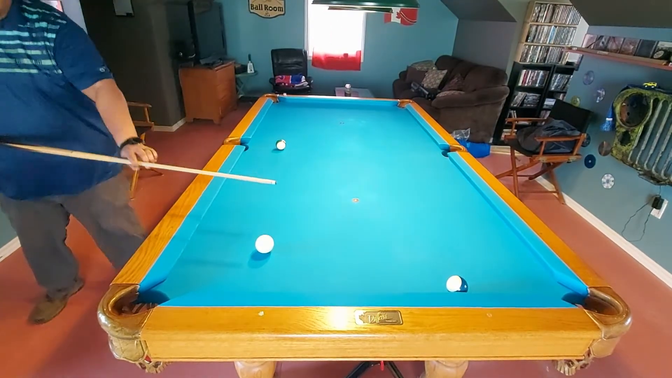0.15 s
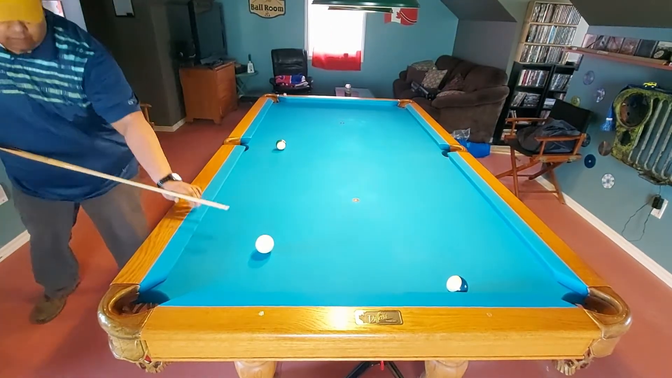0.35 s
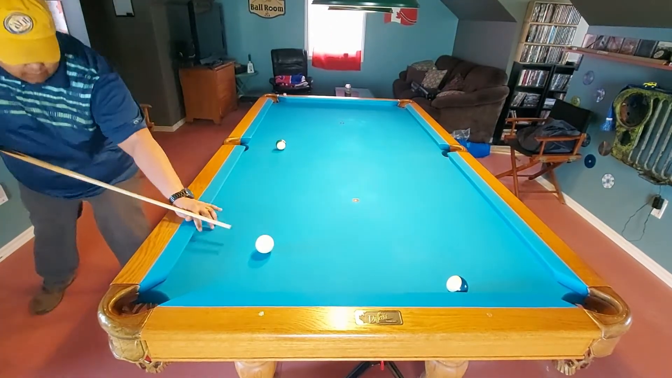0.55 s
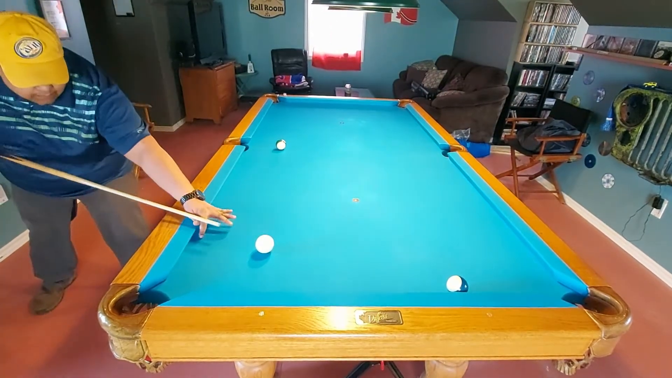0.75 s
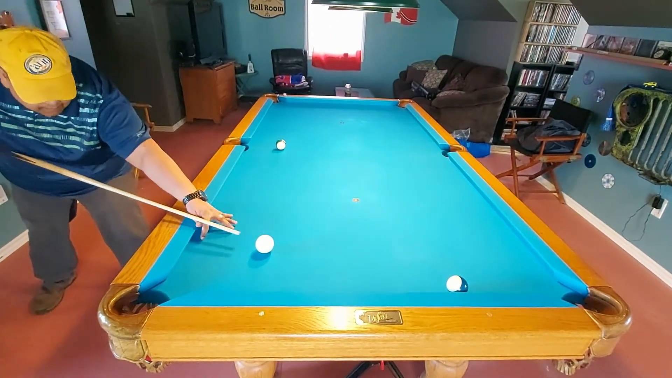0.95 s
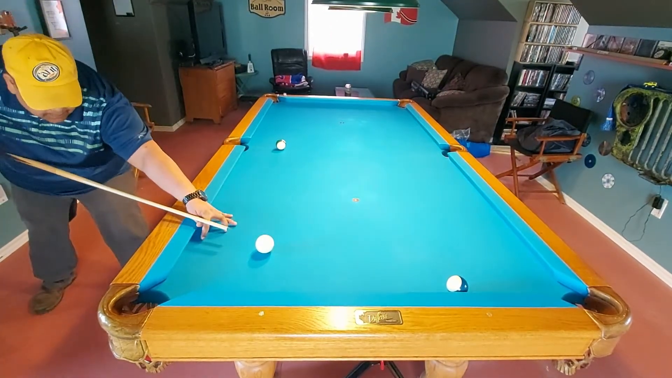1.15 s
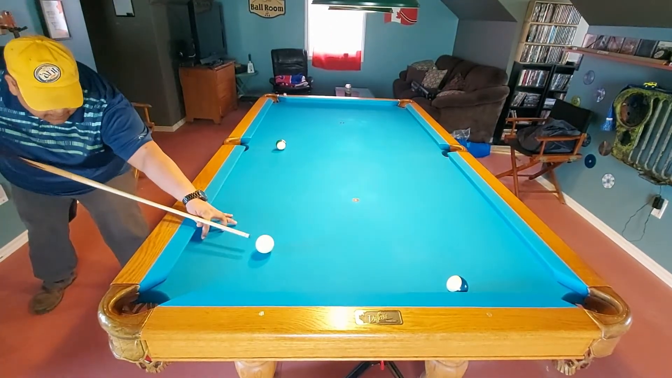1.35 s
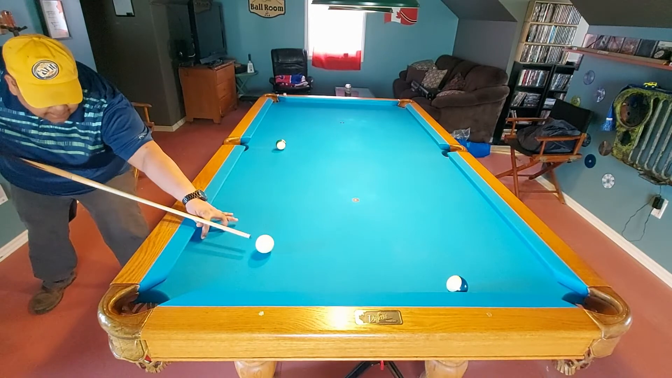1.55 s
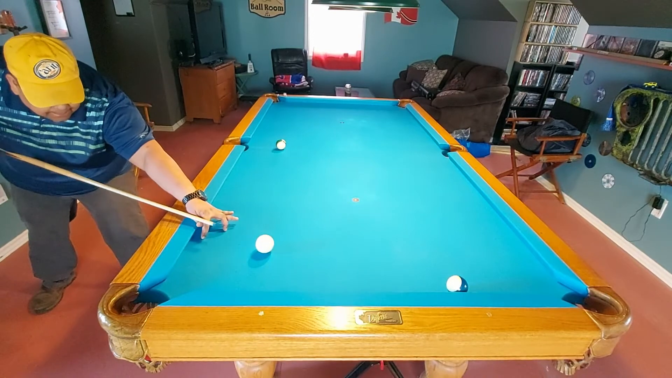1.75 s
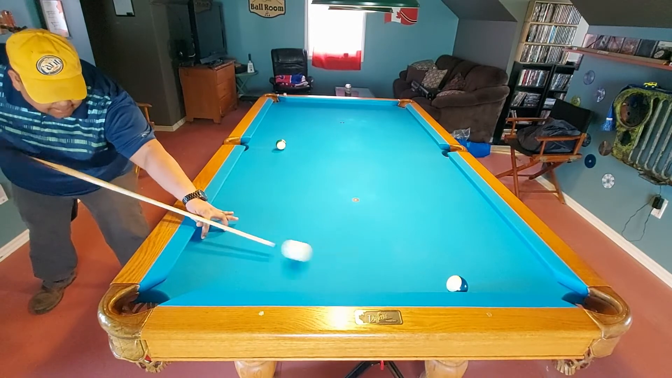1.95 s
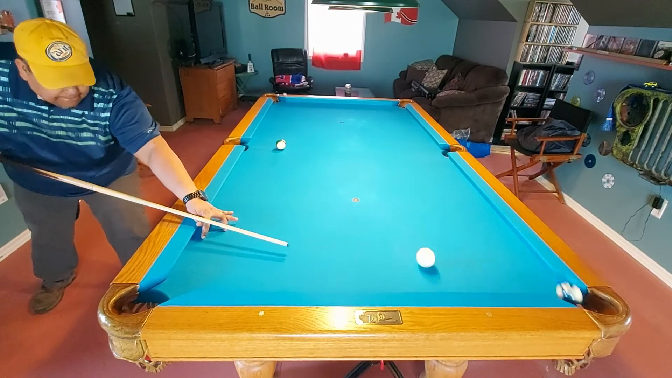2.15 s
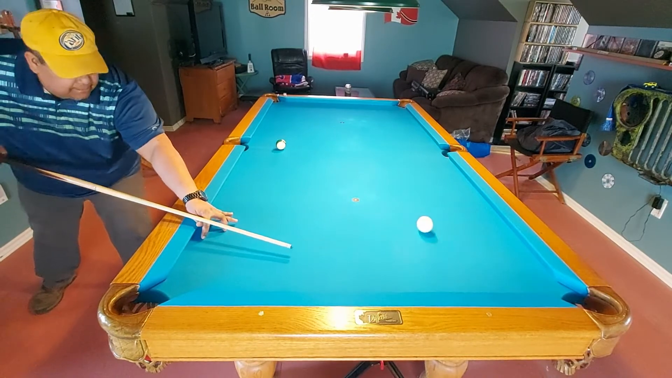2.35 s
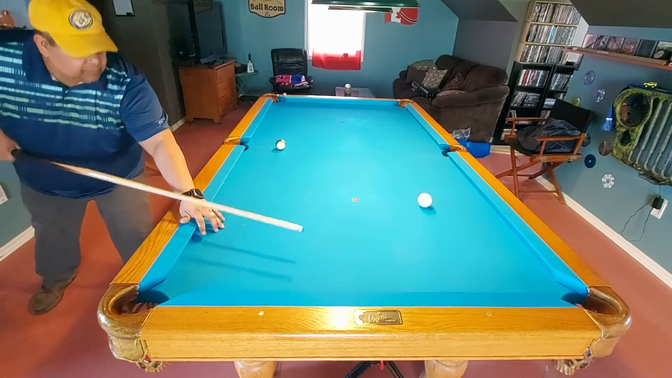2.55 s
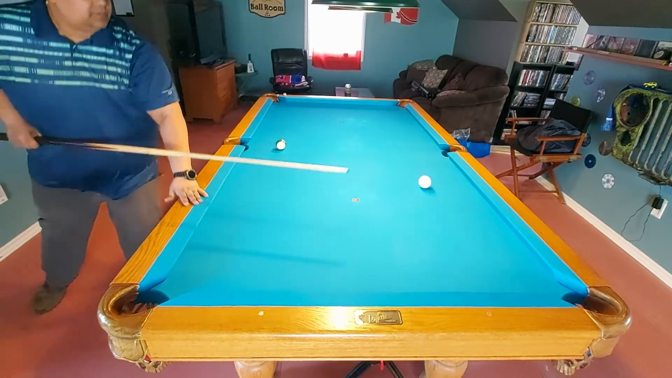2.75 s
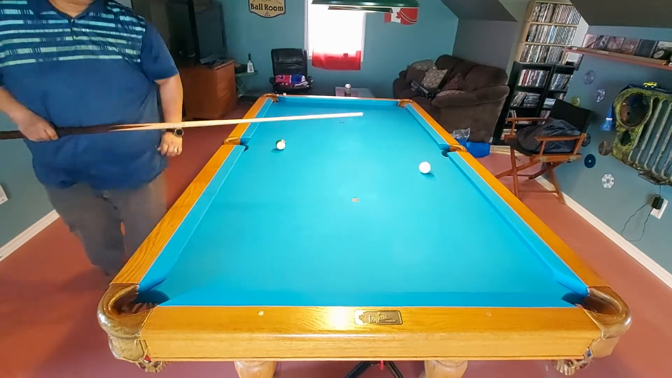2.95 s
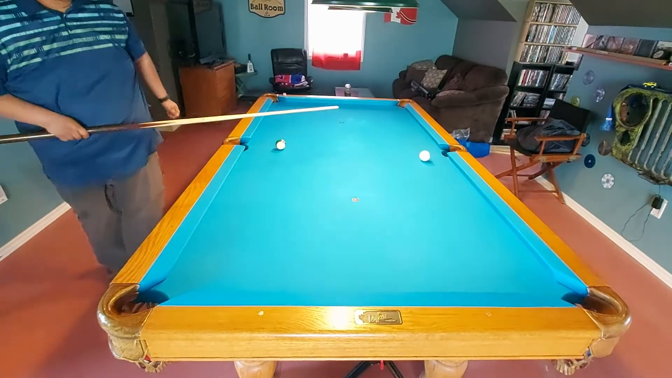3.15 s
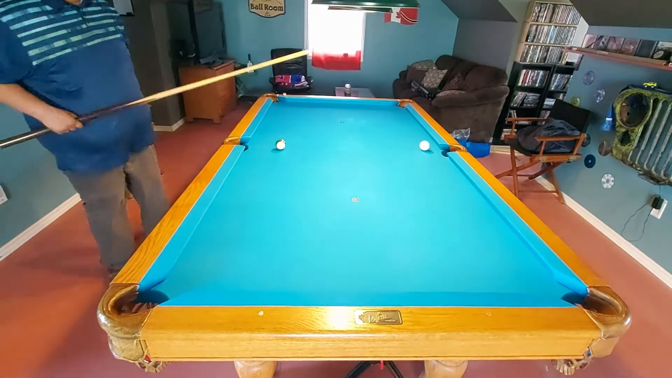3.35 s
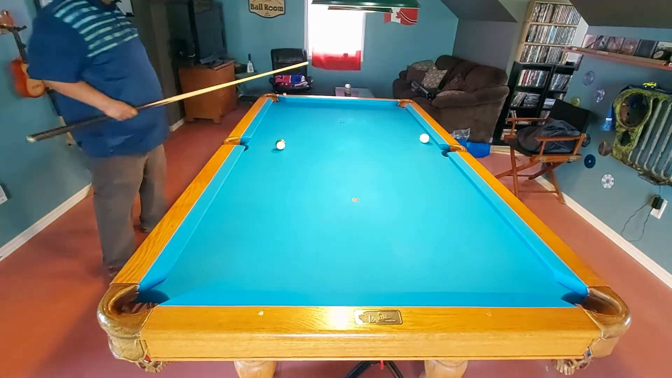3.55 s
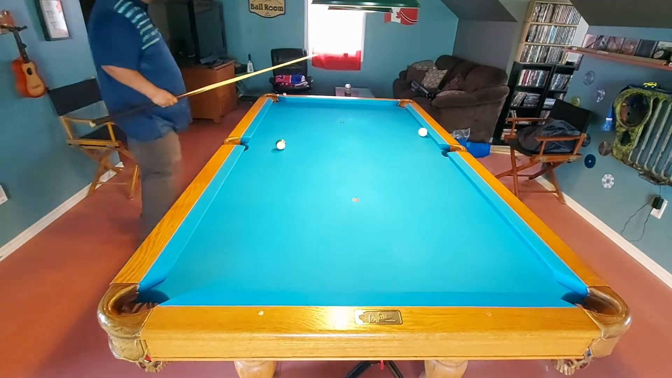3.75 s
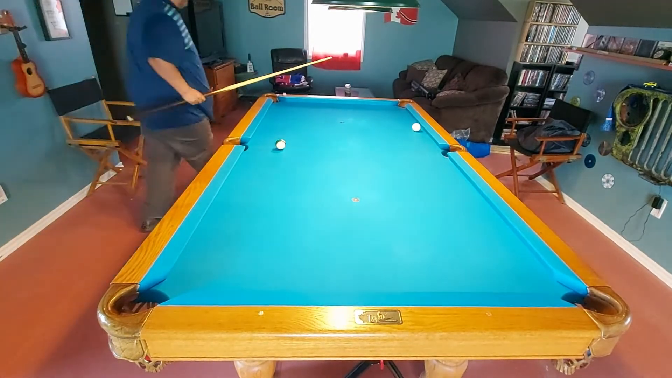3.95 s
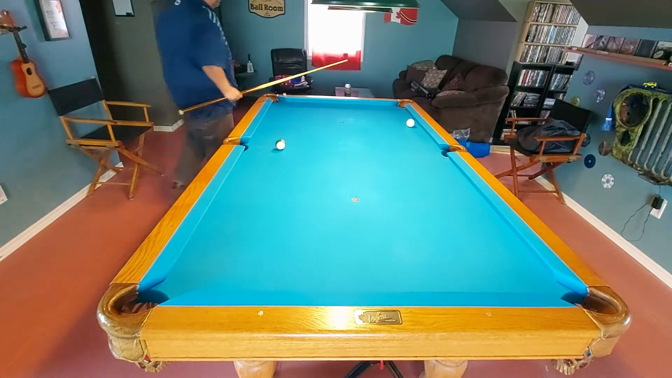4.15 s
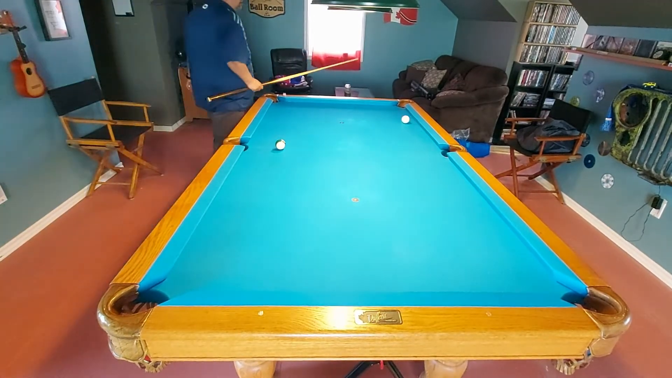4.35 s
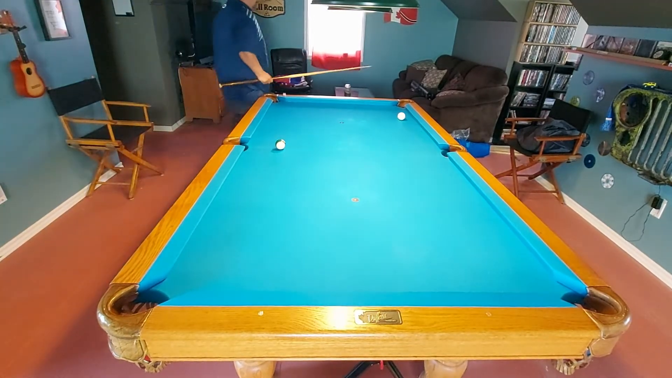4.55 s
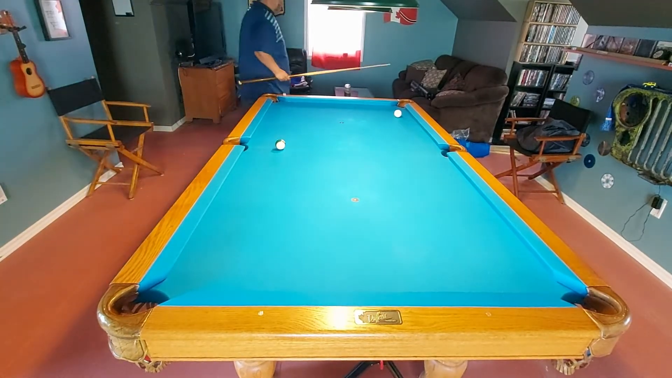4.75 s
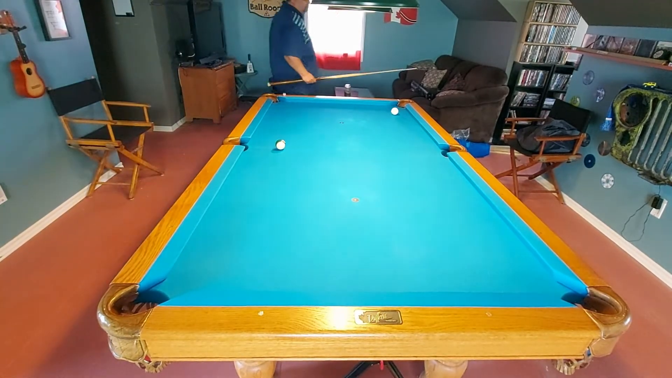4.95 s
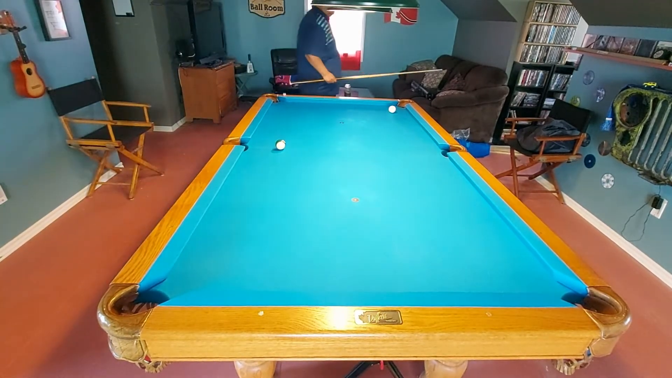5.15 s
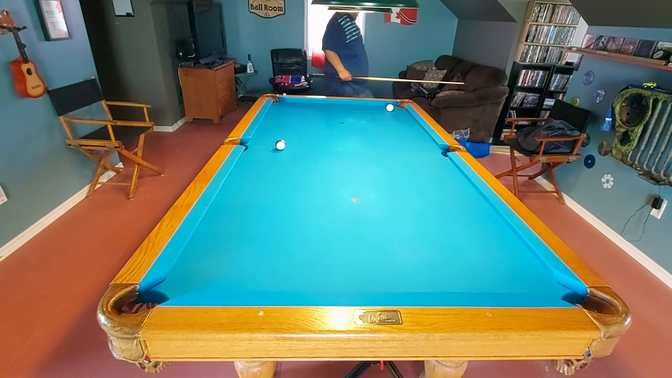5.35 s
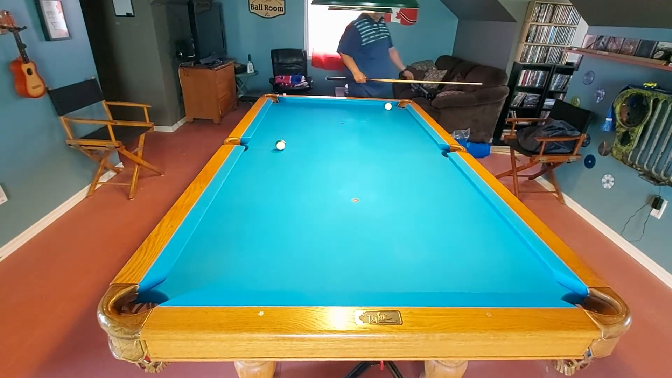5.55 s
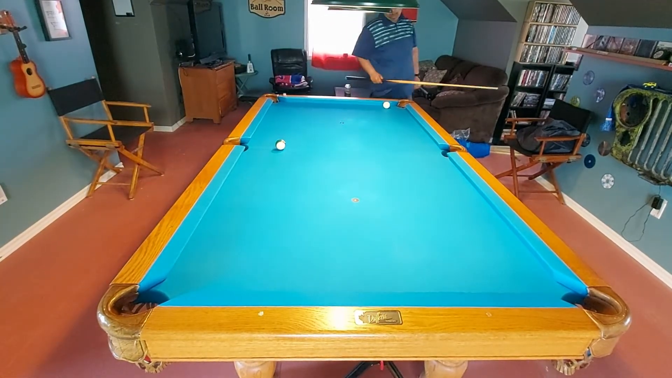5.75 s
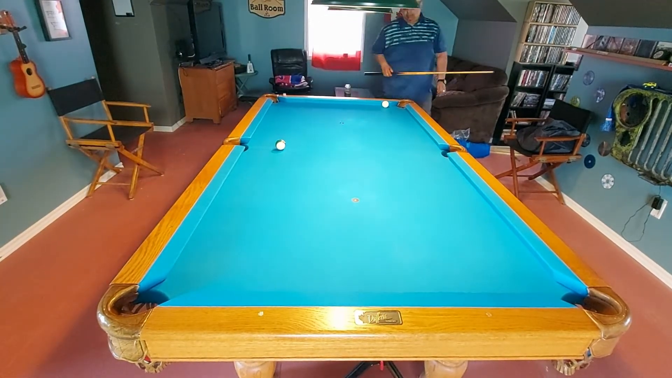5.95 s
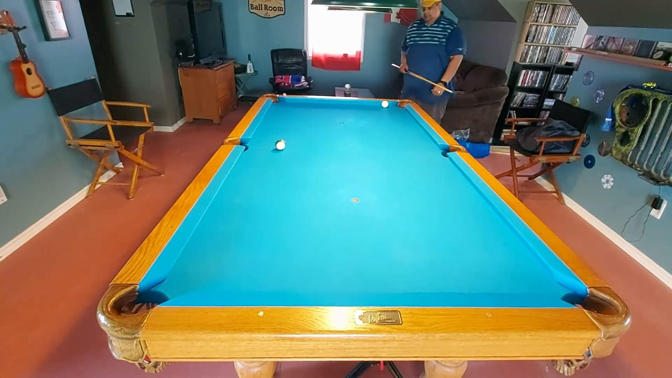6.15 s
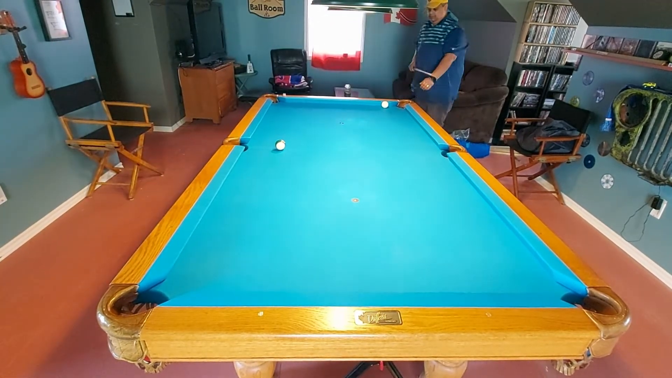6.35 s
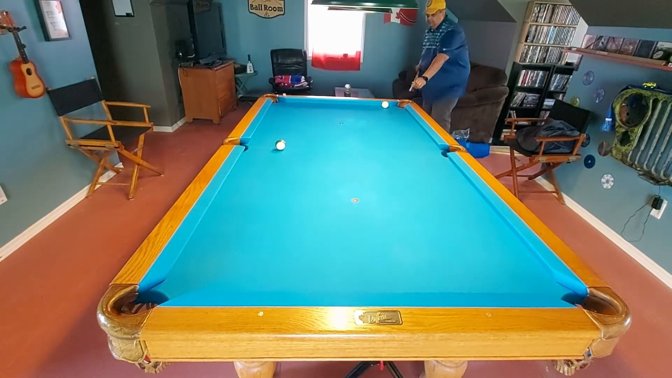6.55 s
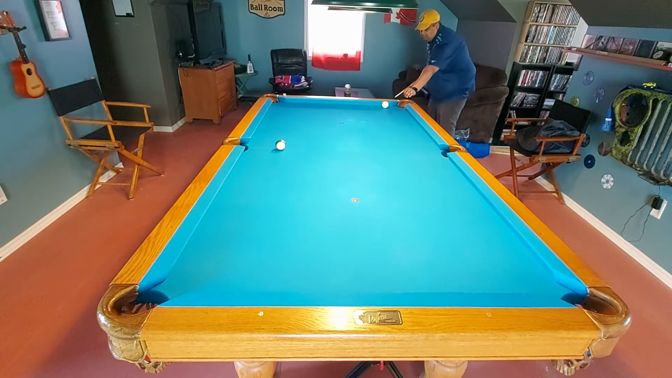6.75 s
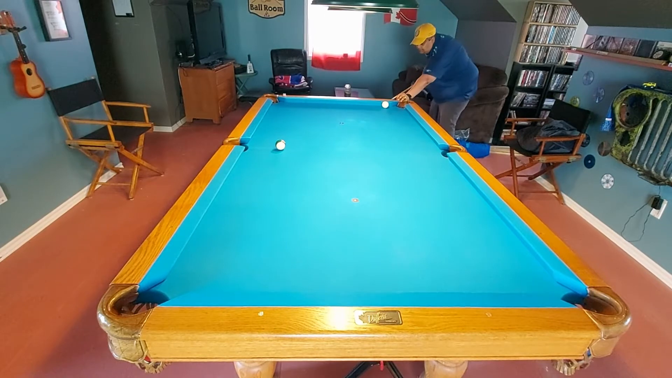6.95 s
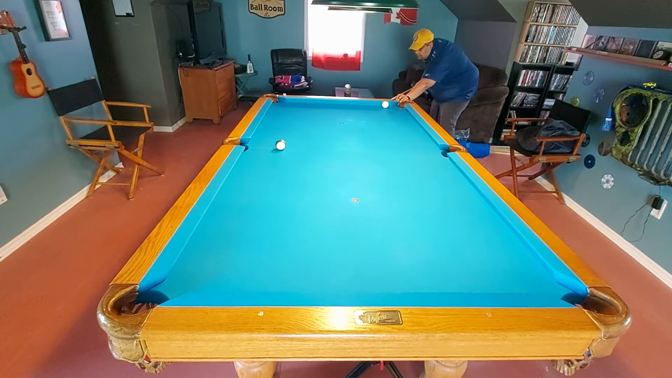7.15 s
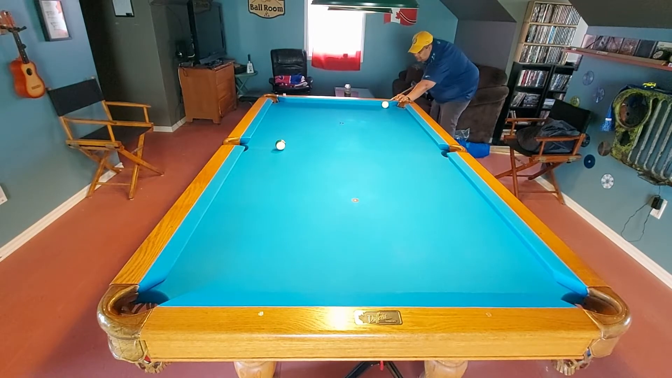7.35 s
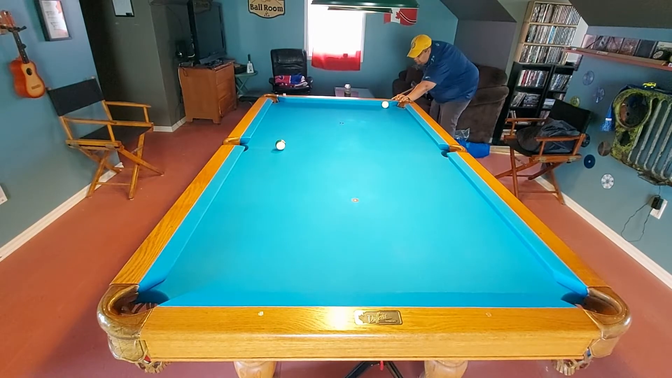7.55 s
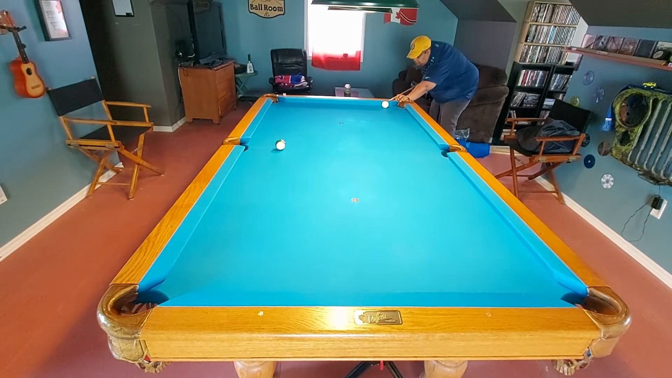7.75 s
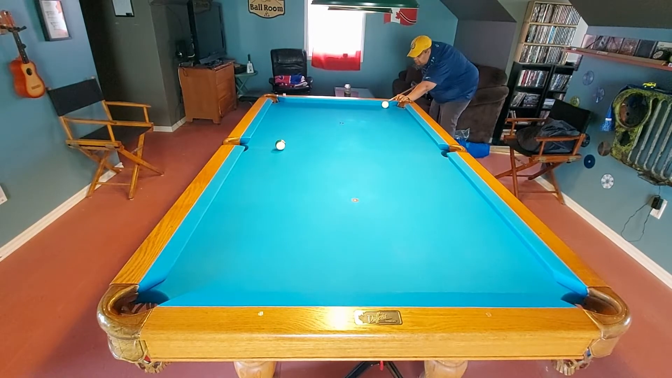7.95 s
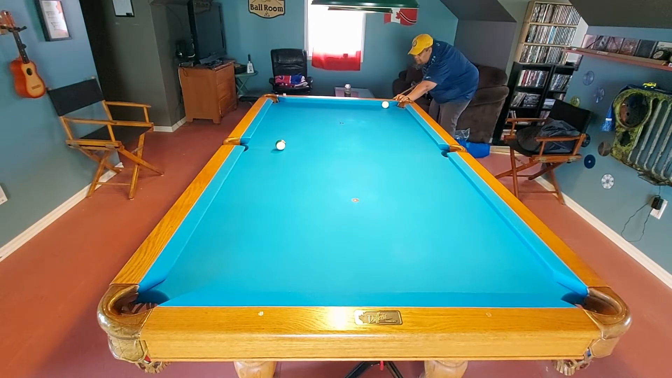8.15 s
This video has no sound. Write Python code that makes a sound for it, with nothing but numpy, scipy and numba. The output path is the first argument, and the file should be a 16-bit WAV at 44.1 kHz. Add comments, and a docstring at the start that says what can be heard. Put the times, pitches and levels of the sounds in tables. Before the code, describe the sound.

A carpeted games room, heard in stereo from near the table. From 0 to 1.9 seconds there is low mains hum and soft air noise, with dull footfalls at about 0.1, 0.2 and 0.5 and tiny bright metal ticks around 1.3 and 1.4. At 1.94 the cue knocks the ball; a very loud, hard ball-on-ball crack follows at 2.06 and a woody pocket knock at 2.14, merging into one dense burst. Weaker clacks on balls in the pocket come at 2.26, 2.35 and 2.42, ringing out briefly. The hum is gone and a faint hush remains. From about 2.75 to 6.6 the player walks: low ringing thuds, board and joist grumble, brushing shoes and cloth, strongest near 4.4 and 5.9. After 7 only faint, low floor thuds and soft rumble remain until about 8.

```python
"""Pool shot and walk

A pool shot in a carpeted games room: cue on ball, ball on ball, ball into the pocket and onto balls lying
there. Each knock is a dense, held wash of noise echoes; what rang before sinks just ahead of each later knock,
and hard clicks stand out of it. Mains-hum sines, noise room air, a few footfalls and small metal ticks come
before the shot. Afterwards the player walks round the table: ringing thuds, board and joist noise, swells of
shoe and cloth noise."""
import sys
import numpy as np
from scipy import signal
from scipy.fft import rfft, irfft, next_fast_len
from scipy.io import wavfile
from numba import njit

SR = 44100
rng = np.random.default_rng(int(sys.argv[2]) if len(sys.argv) > 2 else 0)


def dump(signal):
    """Clip the signal to [-1, 1] and save it as 16-bit WAV at the path in sys.argv[1]."""
    limited = np.clip(np.atleast_2d(signal).T, -1, 1)
    pcm = np.round(limited * 32767).astype(np.int16)
    wavfile.write(sys.argv[1], SR, pcm)


N = 361619  # length in samples

# Mains hum lines: pitch_hz, level_db before a shared trim
HUM_LINES = [(59.9, -45), (119.8, -52.5), (212, -62)]
# How far the left side leads on each hum line: phase_rad
HUM_LEAD_RAD = [.1, 0.53, .4]
# Hum and air over time, dropping away just before the shot: time_s, air_db, hum_change_db
ROOM_TONE = [(0, -49, -5), (.15, -47.5, 0.5), (.35, -50, -1.5), (.5, -47, -4), (.65, -50, -1.5),
             (1.868, -50.5, -2.5), (1.876, -74, -21), (1.94, -72, -14), (2.0, -86, -40.5),
             (8.2, -75, -41.5)]
# Tone colour of the room air: freq_hz, relative_db
AIR_COLOUR = [(15, -45), (25, -12), (64, -7), (91, -20), (107, -13.5), (129, -9), (152, -22), (215, -15),
              (267, -20), (297, -19.5), (666, -26), (2560, -31.5), (15500, -41)]
# Left-right likeness of the room air: freq_hz, likeness (0 to 1)
AIR_LIKENESS = [(60, 1), (200, 0.81), (1000, 0.85), (5000, 0.66), (15000, .4)]

# Weight coming down on a floorboard:
# full_level_s, rise_s, held_s, boards_db, board_pitch_hz, joists_db
FLOOR_LOADS = [(0.2, 0.033, 0.061, -47.5, 320, -73), (2.5, 0.037, 0.041, -57, 155, -58),
               (2.64, .03, .01, -65, 152, -58), (2.78, 0.032, .01, -55.5, 248, -69.5),
               (2.95, 0.032, 0.1, -53, 179.5, -53), (3.249, 0.031, 0.011, -43.5, 222, -52),
               (3.35, .04, 0.0082, -44, 306, -66), (3.49, .04, 0.1, -52.5, 172, -55),
               (3.929, 0.099, 0.0083, -59, 252, -59), (4.01, 0.026, 0.1, -49, 173, -50),
               (4.29, 0.033, .01, -50.5, 196, -53), (4.4, 0.018, 0.11, -39.5, 163, -63),
               (4.54, 0.043, 0.067, -44.5, 340, -62), (4.849, 0.11, 0.086, -48, 165, -53.5),
               (5.248, 0.035, 0.0044, -37.5, 194, -46), (5.36, .04, .01, -44.5, 288, -56),
               (5.56, 0.038, 0.04, -44, 299, -52), (5.72, .05, 0.012, -56, 178, -53),
               (5.95, 0.034, 0.024, -42, 151, -55.5), (6.1, .05, 0.021, -63.5, 180, -55.5),
               (6.33, 0.072, 0.091, -47.5, 199, -48), (6.63, 0.022, 0.014, -37, 162, -44),
               (6.93, .02, .02, -59, 142, -51.5), (7.24, .04, .1, -64, 146, -49.5),
               (7.48, 0.065, 0.012, -58.5, 171.2, -54.5), (7.62, .05, 0.045, -69.5, 140, -57),
               (7.78, 0.046, .01, -61, 138, -54.5), (7.94, 0.066, .01, -65, 170, -56),
               (8.13, .04, 0.069, -62.5, 188, -49)]
# Low rumble: the shot shakes the floor, then a faint rest stays: time_s, level_db
FLOOR_SHAKE = [(1.94, -66), (2.01, -44), (2.22, -54.5), (2.32, -44), (2.45, -57.5), (5.0, -61), (8.2, -64)]
# Broad grumble of the boards: freq_hz, relative_db
BOARDS_COLOUR = [(65, -37), (110, -15), (146, 0.5), (198, -13.5), (270, -5.5), (337, -6), (405, -5.5),
                 (503, -16.5), (800, -24), (1040, -43), (1760, -120)]
# Low rumble of the joists: freq_hz, relative_db
JOISTS_COLOUR = [(15, -57.5), (25, -29.5), (39, -16), (49, -5), (86, 0), (114, -4.5), (140, -4), (180, -32),
                 (310, -120)]
BOARDS_FADE_DB_PER_S, JOISTS_FADE_DB_PER_S, JOISTS_LAG_S = 185, 62, 0.019
BOARD_WIDTH_HZ, BOARD_RING_DB = 46, -4
# Left-right likeness of the walking sounds and the hush: freq_hz, likeness (0 to 1)
WALK_LIKENESS = [(30, .6), (80, 0), (500, 0.01), (10000, 0)]
# Footfalls: start_s, level_db, thud_pitch_hz, push_t60_s
FOOTFALLS = [(0.129, -34.5, 72, 0.4), (0.209, -40, 72, 0.39), (0.492, -40, 72.7, 0.28),
             (2.948, -43.5, 191, 0.41), (3.233, -39, 231.4, 0.22), (3.344, -39.5, 265.5, 0.35),
             (3.47, -41.5, 141, 0.34), (3.829, -48.5, 652, 0.2), (4.001, -42, 73, 0.33),
             (4.394, -28.5, 137.6, 0.52), (4.468, -34.5, 246, 0.38), (4.743, -46, 282, 0.34),
             (4.975, -51, 800, 0.2), (5.195, -37, 73.7, 0.26), (5.231, -38, 132, 0.34),
             (5.537, -47, 378, 0.33), (5.763, -52, 82, 0.28), (5.942, -31.5, 145.4, 0.43),
             (6.298, -44, 118, 0.27), (6.611, -36.5, 97, 0.32), (6.877, -40, 91, 0.24),
             (7.096, -46, 91.5, 0.35), (7.767, -41.5, 80.7, 0.4), (8.011, -46, 96, 0.35)]

# Small metal ticks: start_s, level_db
METAL_TICKS = [(1.2755, -41), (1.311, -56), (1.374, -37.5), (1.389, -57), (1.409, -56)]
# Ringing modes of the metal: pitch_hz, relative_db, t60_s
METAL_MODES = [(3250, -15, .012), (6000, 0.5, 0.0053), (7300, -18, .01), (8300, -2, .02), (9290, 1, 0.019),
               (10550, -4, .01), (11600, -14, .01), (13300, -5, .012), (14350, 1, 0.022),
               (14800, -12, .012)]

# Knocks of cue on ball: start_s, start_level_db, rise_s, held_s, lift_while_held_db_per_s,
# lead_s (how early older knocks start to sink), sink_db (how far they sink)
CUE_HITS = [(1.938, -20.5, 0.0014, .04, 59.5, .066, 20), (1.986, -27.5, .003, .055, 80, .006, 2.5)]
# Knocks of ball on ball: same columns as CUE_HITS
BALL_HITS = [(2.052, -12.5, .011, 0.046, 39.92, .006, 8), (2.108, -21, 0.0044, .012, 30, 0.0046, 2)]
# Knocks of ball into pocket: same columns as CUE_HITS
POCKET_HITS = [(2.137, -10.5, 0.0058, .02, 59.74, .02, 4), (2.163, -15.5, .003, 0.023, 40, 0.0046, 2)]
# Knocks on the balls lying in the pocket: same columns as CUE_HITS
NESTED_HITS = [(2.256, -25, .004, 0.057, 60, 0.0033, 0.93), (2.34, -32.5, 0.0019, 0.013, 60, .012, 3.8),
               (2.356, -30.5, 0.0021, 0.031, 60, .003, 1), (2.421, -39, 0.0033, 0.026, 60, .006, 0.82)]
# Tone colour of cue on ball: freq_hz, relative_db
CUE_COLOUR = [(24, -44.5), (40, -17.5), (146, -15.5), (484, -2), (653, -7.5), (740, -5), (881, -8),
              (1020, -7.5), (1450, -19.5), (1770, -11.5), (1960, -21), (3930, -22), (4460, -29.5),
              (11800, -38), (15500, -45.5)]
# Tone colour of ball on ball: freq_hz, relative_db
BALL_COLOUR = [(24, -46.5), (40, -14), (325, -14), (577, -4), (740, -19.5), (949, -10.5), (1280, -7.5),
               (1380, -5.5), (2390, -5), (3930, -15), (5300, -39.5), (7160, -32.5), (11200, -46.5),
               (12400, -33), (15500, -31)]
# Tone colour of the pocket: freq_hz, relative_db
POCKET_COLOUR = [(24, -62), (40, -30), (82, -19), (235, -20.5), (317, -5.5), (548, -6), (606, -4),
                 (797, -9), (1020, -3), (1130, -12.5), (2390, -23.5), (4920, -44), (7340, -50.5),
                 (9650, -62.5), (15500, -66)]
# Tone colour of the balls lying in the pocket: freq_hz, relative_db
NESTED_COLOUR = [(24, -31), (40, -15.5), (64, 2), (132, -24), (192, -5), (301, -11), (387, -24),
                 (461, -13.5), (686, -9), (973, -6), (2220, -1.5), (4460, -26), (7710, -32), (8960, -39),
                 (15500, -29)]
# Resonances of cue on ball: pitch_hz, width_hz, relative_db
CUE_RING = [(468, 190, -2.5), (738, 25, -5), (940, 66, -8.5), (1770, 34, -13.5), (2730, 31, -24),
            (3260, 59, -19.5), (3908, 49, -20), (4670, 82, -28.5)]
# Resonances of ball on ball: pitch_hz, width_hz, relative_db
BALL_RING = [(615, 48, 2.5), (1260, 52, -4.5), (1465, 60, -0.5), (1730, 170, -2), (2335, 38, 1.5),
             (2530, 20, -0.5), (2730, 20, -8.5), (3530, 110, -9)]
# Resonances of the pocket: pitch_hz, width_hz, relative_db
POCKET_RING = [(328, 35, -4.5), (791, 180, 2), (1210, 34, -10.5), (1850, 62, -14.5), (2080, 19, -20)]
# Resonances of the balls lying in the pocket: pitch_hz, width_hz, relative_db
NESTED_RING = [(355, 59, 5), (830, 220, -10), (1910, 14, 1.5), (2040, 9.1, 4), (2285, 43, -28),
               (2420, 20, -2), (2640, 27, 3.5), (3360, 57, 2)]
# Reverberation of the room: freq_hz, t60_s
ROOM_T60 = [(150, 0.61), (400, 0.61), (1000, 0.45), (2500, .38), (5000, 0.29), (12000, 0.3)]
# Left-right likeness of the knocks: freq_hz, likeness (-1 to 1)
KNOCK_LIKENESS = [(60, 0.25), (200, -0.3), (400, -0.066), (2000, .05), (10000, 0.53)]
ECHOES_PER_S, RING_DB, FADE_DB_PER_S = 14000, -4, 58
# Hard arrivals that stand out of the wash: start_s, level_db, upper_ring_hz, t60_s, left_over_right_db
CRACKS = [(2.0623, -5, 1790, 0.039, -2), (2.068, -11.5, 3360, 0.019, 1), (2.1418, -7, 802, 0.1, -1),
          (2.165, -7.5, 820, 0.032, 6), (2.357, -24, 2330, .03, 0), (2.5, -40, 900, 0.14, -2)]

# Scuffs of shoe and trouser cloth: full_level_s, rise_s, held_s, fade_db_per_s, soles_db, cloth_db
SCUFFS = [(2.75, 0.018, 0.038, 251, -56.5, -57), (3.0, 0.087, 0.074, 60, -67, -64),
          (3.231, 0.014, 0.031, 202, -53, -60), (3.41, 0.22, 0.025, 200, -56, -56.5),
          (3.63, 0.087, 0.037, 151, -56, -55.5), (3.831, 0.0073, 0.022, 150, -53, -59.5),
          (3.88, 0.058, 0.099, 100, -64, -54.5), (4.01, 0.034, 0.15, 200, -55.5, -53.5),
          (4.4, 0.062, 0.054, 150, -53, -51.5), (4.479, 0.036, 0.036, 200, -45.5, -48.5),
          (4.6, 0.048, 0.052, 120, -49, -55), (4.79, 0.11, 0.0092, 116, -54, -55.5),
          (4.97, 0.12, 0.028, 198, -52, -55), (5.049, .02, 0.014, 250, -56, -51),
          (5.22, 0.059, 0.069, 116, -53, -57), (5.37, 0.034, .04, 122, -56.5, -57),
          (5.534, 0.016, .07, 147, -51, -54.5), (5.7, 0.14, 0.052, 68, -63, -61.5),
          (5.96, 0.032, 0.054, 150, -56.5, -61.5), (6.044, .02, 0.08, 299, -54.5, -54.5),
          (6.349, 0.031, 0.055, 300, -52, -55), (6.494, 0.027, .045, 305, -53, -53.5),
          (6.618, 0.014, 0.041, 130.5, -53.5, -62.5), (7.086, 0.0084, 0.03, 160.5, -58.5, -62),
          (7.65, .04, 0.025, 100, -82, -78)]
# Faint rustle between the scuffs: time_s, soles_db, cloth_db
RUSTLE = [(2.5, -69, -62), (3.2, -69.5, -67), (4.3, -64, -60), (5.8, -64.5, -64.5), (6.25, -68, -65.5),
          (6.6, -66, -63.5), (6.85, -87.5, -75), (7.3, -91, -81), (7.9, -95, -93), (8.2, -85, -85)]
# Tone colour of the soles: freq_hz, relative_db
SOLES_COLOUR = [(260, -20), (450, -3), (806, -4.5), (927, -6.5), (1140, -7), (1230, -8), (1520, -8),
                (3200, -18), (4160, -43), (7040, -120)]
# Tone colour of the trouser cloth: freq_hz, relative_db
CLOTH_COLOUR = [(1650, -4), (2800, -4.5), (3810, -1.5), (6380, -5), (7520, -3), (8080, -6), (9320, -14.5),
                (12300, -9.5), (15500, -11.5)]
# Tone colour of the quiet hush after the shot: freq_hz, relative_db
HUSH_COLOUR = [(88, -23), (150, -15), (179, 3.5), (366, -3.5), (827, -22.5), (966, -23), (1320, -26.5),
               (2500, -37), (3980, -39.5), (4560, -47), (5870, -38.5), (12300, -30), (15500, -30)]
HUSH_DB = -62
# Faint wavering tones: start_s, end_s, pitch_hz, width_hz, level_db
TONES = [(6.62, 7.32, 98, 3, -47), (6.746, 7.45, 487, 5.6, -71.5), (7.785, 8.2, 323, 4.1, -58),
         (7.944, 8.197, 65.7, 7.2, -47.5), (6.75, 8.2, 3190, 12, -93), (7.33, 7.5, 3900, 30, -88),
         (7.9, 8.1, 3900, 24, -86), (6.98, 7.08, 2250, 150, -80), (2.74, 2.83, 2740, 110, -62)]

RISE_DB = 12  # a swell climbs this much during its rise
BAND_CENTRES_HZ = 28 * 2 ** np.arange(0, 9.6, .5)
MIC_DIP_HZ, MIC_DIP_WIDTH_HZ, MIC_DIP_DB = 9200, 500, -4.5
PEAK_CEILING, CUTOFF_HZ = 1.3, 16100


def from_db(db):
    """Turn dB into gain."""
    return 10 ** (np.asarray(db) / 20)


def rms_one(x):
    """Scale to rms 1."""
    return x / np.sqrt(np.mean(x ** 2) + 1e-20)


def in_time(rows):
    """Draw each column of a timed table as a curve with one value per sample."""
    s, *columns = np.transpose(rows)
    return [np.interp(np.arange(N) / SR, s, column) for column in columns]


def at_hz(points, hz):
    """Read a frequency table on a log-frequency axis."""
    table_hz, values = np.array(points)[:, :2].T
    return np.interp(np.log(hz + 1e-9), np.log(table_hz), values)


def drift(rate):
    """Random wander between knots of spread 1, with `rate` knots a second."""
    knots = rng.standard_normal(int(N / SR * 40) + 2)
    return np.interp(np.arange(N) / SR * min(rate, 39), np.arange(len(knots)), knots)


def ring(push, hz, t60):
    """Two-pole resonance: a unit click sets a decaying sine of starting height about 1 ringing."""
    radius = from_db(-60 / (t60 * SR))
    turn = 2 * np.pi * hz / SR
    # the tiny offset keeps the filter clear of denormal numbers
    return signal.lfilter([0, np.sin(turn)], [1, -2 * radius * np.cos(turn), radius ** 2], push + 1e-18)


def bands(white, spectrum, likeness):
    """Colour two unrelated sources into a stereo pair of rms 1, handed out in half-octave bands."""
    length = white.shape[1]
    size = next_fast_len(length)
    hz = np.arange(size // 2 + 1) * SR / size
    mid, side = rfft(white, size) * from_db(spectrum(hz))
    alike = np.clip(at_hz(likeness, hz), -1, 1)
    pair = np.sqrt(1 + alike) * mid + np.sqrt(1 - alike) * side * [[1], [-1]]
    pair = pair / np.sqrt(np.mean(irfft(pair, size) ** 2))
    for centre in BAND_CENTRES_HZ:
        share = np.clip(1 - np.abs(2 * np.log2(hz / centre + 1e-9)), 0, 1)
        band = pair * share
        if np.max(np.abs(band)) > 1e-4 * np.max(np.abs(pair)):  # skip silent bands
            yield centre, irfft(band, size)[:, :length]


def airy(spectrum, likeness, patchy_db, size=N):
    """Steady noise whose bands flicker a little, partly together; silence after size samples."""
    together = drift(13)
    white = rng.standard_normal((2, size))
    out = np.zeros((2, size))
    for _, band in bands(white, lambda hz: at_hz(spectrum, hz), likeness):
        flicker_db = patchy_db * (together + drift(25))[:size]
        out += from_db(flicker_db) * band
    return np.pad(out, ((0, 0), (0, N - size)))


def swells(s, rise, held, db, fade_db_per_s):
    """Power of each event on a 1 ms grid: it rises, holds, then fades at a steady rate."""
    t = np.arange(0, N / SR, .001)[:, None] - s
    rise_loss_db = RISE_DB * np.maximum(-t, 0) / np.maximum(rise, .003)
    fade_loss_db = fade_db_per_s * np.maximum(t - held, 0)
    return from_db(db - np.minimum(rise_loss_db + fade_loss_db, 120)).T ** 2


def per_sample(slow):
    """Stretch a curve from the 1 ms grid to one value per sample."""
    return np.interp(np.arange(N) / SR, np.arange(len(slow)) / 1000, slow)


def swell_gain(power):
    """Sum the power of all events and read it as one gain curve."""
    return per_sample(np.sqrt(power.sum(axis=0)))


def hum(change_db):
    """Mains lines as sines that waver slightly in level, the left side leading in phase."""
    t = np.arange(N) / SR
    out = np.zeros((2, N))
    for (hz, db), lead in zip(HUM_LINES, HUM_LEAD_RAD):
        level_db = db + 5.5 + 1.5 * drift(4.3)
        out += from_db(level_db) * np.sin(2 * np.pi * hz * t + np.array([[lead], [0]]))
    return out * from_db(change_db)


def room_tone():
    """Hum and a short stretch of noise room air, both following the room-tone curve."""
    air_db, hum_db = in_time(ROOM_TONE)
    air = airy(AIR_COLOUR, AIR_LIKENESS, patchy_db=1.0, size=2 * SR)
    return from_db(air_db) * air + hum(hum_db)


@njit
def gliding(x, turn, r):
    """A resonance whose centre (radians per sample) moves."""
    y = np.zeros_like(x)
    for i in range(2, len(x)):
        y[i] = x[i] - x[i - 2] + 2 * r * np.cos(turn[i]) * y[i - 1] - r * r * y[i - 2]
    return y


def boards(hz):
    """Loaded boards grumble broadly, while a double gliding resonance rings at the pitch underfoot."""
    turn = 2 * np.pi * hz / SR
    radius = np.exp(-np.pi * BOARD_WIDTH_HZ / SR)
    noise = rng.standard_normal((2, N))
    ringing = np.array([gliding(gliding(x, turn, radius), turn, radius) for x in noise])
    grumble = airy(BOARDS_COLOUR, WALK_LIKENESS, patchy_db=3.3)
    return from_db(BOARD_RING_DB) * rms_one(ringing) + from_db(-3) * grumble


def floor():
    """Loads swell the boards at their power-weighted mean pitch; the joists answer later and longer."""
    s, rise, held, boards_db, hz, joists_db = np.transpose(FLOOR_LOADS)
    board_power = swells(s, rise, held, boards_db, BOARDS_FADE_DB_PER_S)
    board_hz = per_sample((board_power * hz[:, None]).sum(axis=0) / board_power.sum(axis=0))
    joist_gain = swell_gain(swells(s + JOISTS_LAG_S, rise, held, joists_db, JOISTS_FADE_DB_PER_S))
    shake_db, = in_time(FLOOR_SHAKE)
    rumble_gain = np.hypot(joist_gain, from_db(shake_db))
    rumble = rumble_gain * airy(JOISTS_COLOUR, WALK_LIKENESS, patchy_db=3.2)
    return rumble + swell_gain(board_power) * boards(board_hz)


def footfalls():
    """A soft heel lands at once, then rolls on roughly; both set the floor's thud ringing."""
    size = SR // 2
    t = np.arange(size) / SR
    out = np.zeros((2, N + SR))
    for s, db, hz, t60 in FOOTFALLS:
        push = rng.standard_normal((2, size)) * from_db(-60 * t / t60)
        push[:, 0] = [120.0, 50.0]  # heel landing, left and right
        thud = ring(ring(push, hz, 0.15), hz * 1.28, 0.021)
        thud = thud / np.abs(thud).max(axis=1, keepdims=True)
        start = round(s * SR)
        out[:, start:start + size] += from_db(db - 1.0) * thud
    return out[:, :N]


def ticks():
    """Each tick is a rough contact of a few ms that strikes every mode with a strength of its own."""
    t = np.arange(SR // 10) / SR
    contact_shape = np.minimum(t / 0.00063, 1) * from_db(-60 * t / 0.011)
    out = np.zeros((2, N))
    for s, db in METAL_TICKS:
        start = round(s * SR)
        for hz, mode_db, t60 in METAL_MODES:
            contact = rng.standard_normal((3, len(t))) * contact_shape
            # a shared contact plus a little of each side's own
            struck = ring(contact[0] + 0.096 * contact[1:], hz, t60)
            level_db = db + mode_db - 10.5 + rng.normal(0, 0.75)
            out[:, start:start + len(t)] += from_db(level_db) * struck
    return out


def knocks(hits, spectrum, modes):
    """Each knock is a swarm of uneven echoes; treble dies first, and it sinks just before each later knock."""
    size = SR // 2
    t = np.arange(size) / SR
    out = np.zeros((2, N))
    every_hit = CUE_HITS + BALL_HITS + POCKET_HITS + NESTED_HITS

    def colour(hz):
        """Lift the broad colour around each resonance."""
        ringing = sum(from_db(db + RING_DB) / (1 + (2 * (hz - at) / width) ** 2) for at, width, db in modes)
        return at_hz(spectrum, hz) + 20 * np.log10(1 + 2 * ringing)

    for s, db, rise, held, lift_db_per_s, _, _ in hits:
        strength_db = 0.88 * np.minimum(rng.exponential(1, (2, size)), 3)
        echoes = rng.standard_normal((2, size)) * from_db(strength_db)
        echoes = echoes * (rng.random((2, size)) < ECHOES_PER_S / SR)
        level_db = db + lift_db_per_s * np.minimum(t, held) - FADE_DB_PER_S * np.maximum(t - held, 0)
        for later, *_, lead, sink_db in every_hit:
            if later > s:
                level_db = level_db - sink_db * np.clip((t + s - later + lead) / 0.045, 0, 1)
        wash = np.zeros((2, size))
        for hz, band in bands(echoes, colour, KNOCK_LIKENESS):
            wash += band * from_db(-60 * t / at_hz(ROOM_T60, hz))
        onset = np.minimum(t / rise, 1) ** 2
        start = round(s * SR)
        out[:, start:start + size] += wash * from_db(level_db) * onset
    return out


def pool_shot():
    """The four kinds of knock, each with its own colour and resonances."""
    shot = knocks(CUE_HITS, CUE_COLOUR, CUE_RING)
    shot = shot + knocks(BALL_HITS, BALL_COLOUR, BALL_RING)
    shot = shot + knocks(POCKET_HITS, POCKET_COLOUR, POCKET_RING)
    return shot + knocks(NESTED_HITS, NESTED_COLOUR, NESTED_RING)


def cracks():
    """A hard arrival is one soft click into a pair of resonances, the lower one opposed between the sides."""
    click = np.eye(1, SR // 4)[0]
    out = np.zeros((2, N))
    for s, db, hz, t60, pan_db in CRACKS:
        soft = signal.lfilter(*signal.butter(2, hz * 1.9, fs=SR), click)
        upper, lower = ring(soft, hz, t60), ring(soft, hz * 0.6, t60)
        pair = np.array([upper + 1.1 * lower, .8 * upper - 1.1 * lower])
        pair = pair * from_db([[pan_db / 2], [-pan_db / 2]])
        start = round(s * SR)
        out[:, start:start + len(click)] += from_db(db - 5) * pair
    return out


def hush(after_shot):
    """Quiet, nearly steady noise that comes up after the shot."""
    return after_shot * from_db(HUSH_DB) * airy(HUSH_COLOUR, WALK_LIKENESS, patchy_db=0.55)


def scuffing(after_shot):
    """Noise of soles and cloth swells together at each scuff, over a faint rustle."""
    s, rise, held, fade, soles_db, cloth_db = np.transpose(SCUFFS)
    rest_soles_db, rest_cloth_db = in_time(RUSTLE)
    soles_gain = swell_gain(swells(s, rise, held, soles_db, fade))
    cloth_gain = swell_gain(swells(s, rise, held, cloth_db, fade))
    soles_gain = np.hypot(soles_gain, after_shot * from_db(rest_soles_db))
    cloth_gain = np.hypot(cloth_gain, after_shot * from_db(rest_cloth_db))
    soles = soles_gain * airy(SOLES_COLOUR, WALK_LIKENESS, patchy_db=1.35)
    return soles + cloth_gain * airy(CLOTH_COLOUR, WALK_LIKENESS, patchy_db=2.0)


def tones():
    """Noise through a narrow resonance, faded in and out, is heard as a wavering tone."""
    out = np.zeros((2, N))
    for start, end, hz, width, db in TONES:
        at = np.arange(round(start * SR), min(round(end * SR), N))
        fade = np.clip(np.minimum(at / SR - start, end - at / SR) / 0.034, 0, 1)
        t60 = np.log(1000) / (np.pi * width)
        narrow = ring(rng.standard_normal((2, 2 * SR)), hz, t60)
        out[:, at] += from_db(db) * fade * rms_one(narrow[:, -len(at):])
    return out


def scene():
    """Room tone, the shot and the walk round the table."""
    t = np.arange(N) / SR
    after_shot = np.clip((t - 2.45) / 0.054, 0, 1)  # the quiet sounds come up as the knocks die
    before = room_tone() + floor() + footfalls() + ticks()
    shot = pool_shot() + cracks()
    return before + shot + hush(after_shot) + scuffing(after_shot) + tones()


def record(dry):
    """The microphone has a dip in the treble; the highest peaks are rounded and the top is cut."""
    b, a = signal.iirpeak(MIC_DIP_HZ, MIC_DIP_HZ / MIC_DIP_WIDTH_HZ, fs=SR)
    coloured = dry - (1 - from_db(MIC_DIP_DB)) * signal.lfilter(b, a, dry)
    rounded = PEAK_CEILING * np.tanh(coloured / PEAK_CEILING)
    top_cut = signal.cheby2(16, 60, CUTOFF_HZ, fs=SR, output="sos")
    return signal.sosfilt(top_cut, rounded)


dry = scene()
out = record(dry)
dump(out)
```